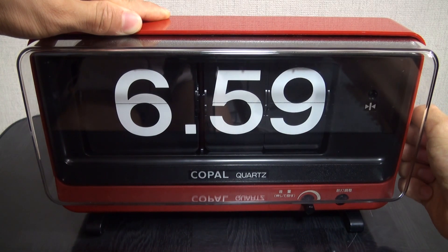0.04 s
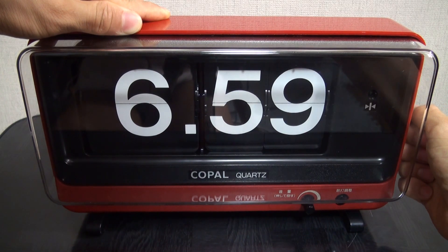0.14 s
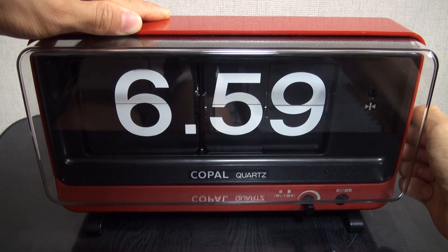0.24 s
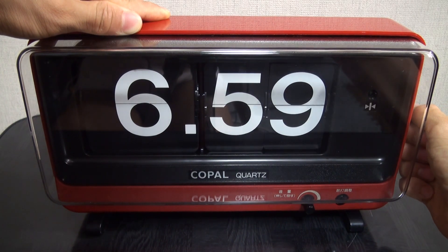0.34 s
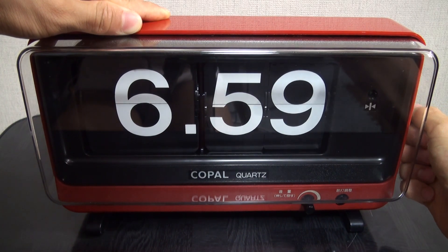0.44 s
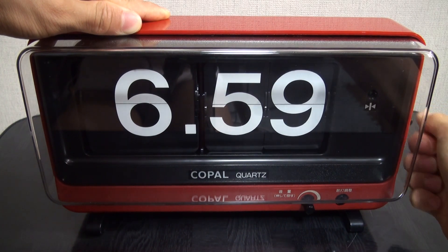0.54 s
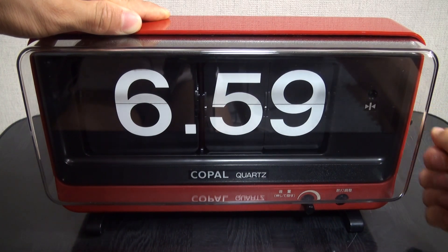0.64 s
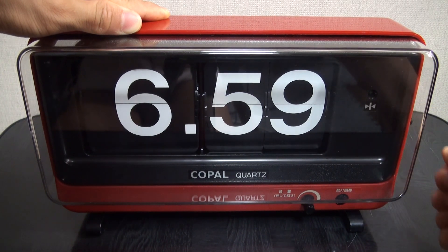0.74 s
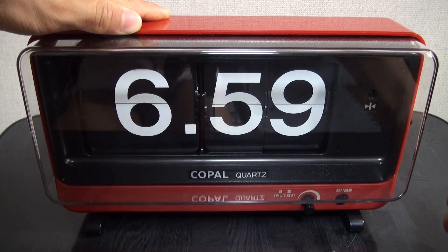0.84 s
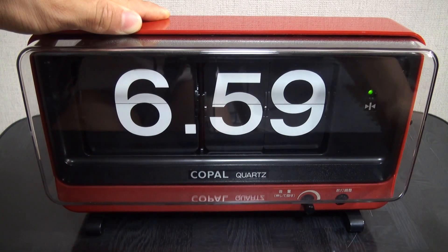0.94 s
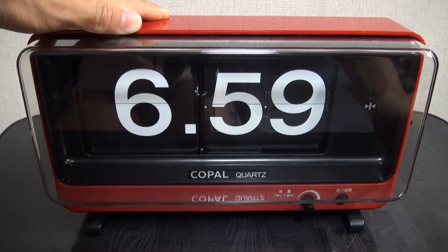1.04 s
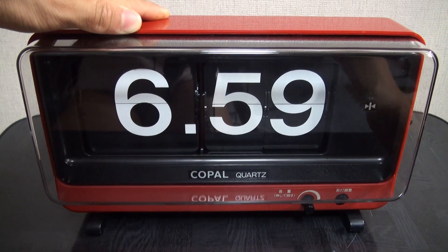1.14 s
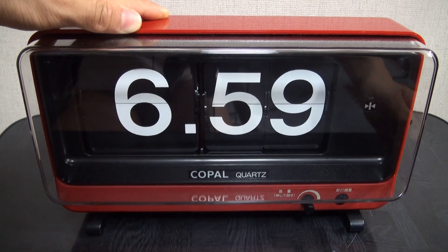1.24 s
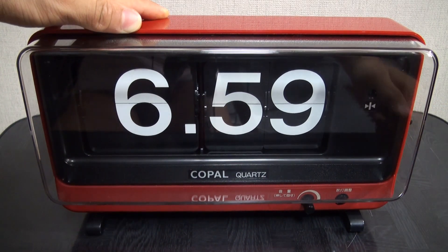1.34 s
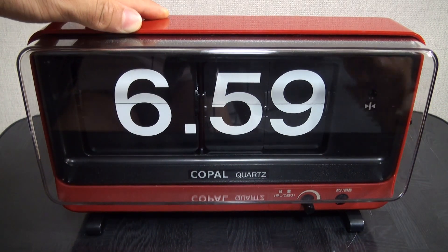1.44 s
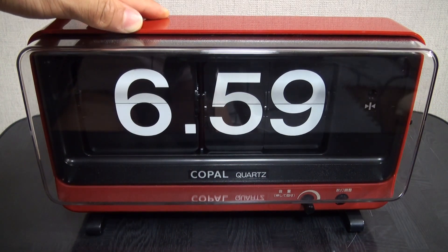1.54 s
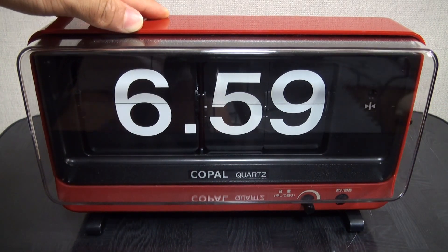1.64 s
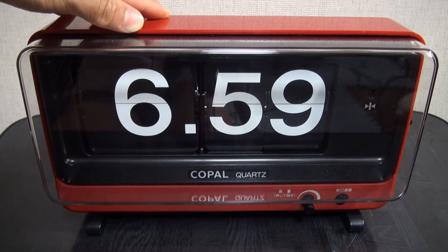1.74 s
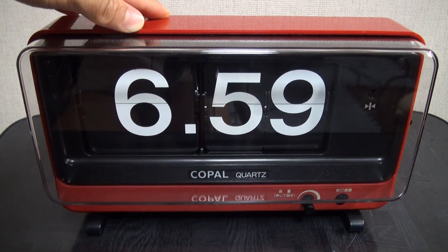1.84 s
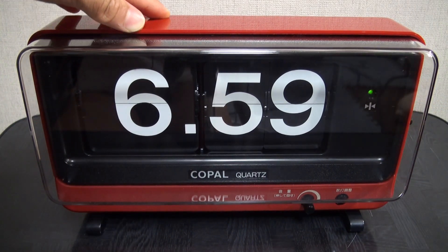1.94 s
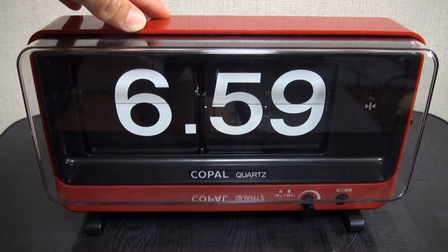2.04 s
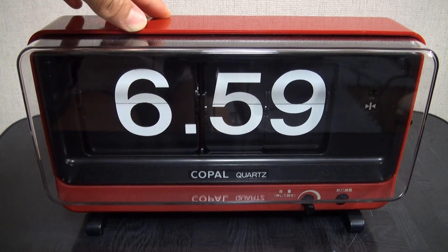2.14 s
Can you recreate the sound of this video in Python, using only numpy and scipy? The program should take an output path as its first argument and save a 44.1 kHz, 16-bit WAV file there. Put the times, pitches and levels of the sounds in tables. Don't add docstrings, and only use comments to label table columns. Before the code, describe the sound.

Close up in a small humming room, a plastic clock knob clicks sharply into place, a dull drag and thump follow, then the other hand makes a lighter click, a faint knock and tiny creaks.

```python
import sys
import numpy as np
from scipy import signal
from scipy.fft import rfft, irfft
from scipy.io import wavfile

SR = 44100
rng = np.random.default_rng(int(sys.argv[2]) if len(sys.argv) > 2 else 0)


def wrap_up_sound(samples):
    columns = np.atleast_2d(samples).T
    tamed = np.clip(columns, -1, 1)
    steps = np.round(tamed * 32767).astype(np.int16)
    wavfile.write(sys.argv[1], SR, steps)


def how_loud(loudness_db):
    steps = np.asarray(loudness_db, float) / 20
    return 10 ** steps


N = 97020


def rms_one(x):
    return x / np.sqrt(np.mean(x ** 2) + 1e-20)


def at_hz(points, hz):
    table_hz, values = np.array(points).T
    return np.interp(np.log(hz), np.log(table_hz), values)


def placed(sound, s):
    out, i = np.zeros(N + SR), int(s * SR)
    out[i:i + len(sound)] = sound
    return out[:N]


def resonate(x, hz, width_hz):
    r = np.exp(-np.pi * width_hz / SR)
    gain = (1 - r * r) / 2
    return signal.lfilter([gain, 0, -gain], [1, -2 * r * np.cos(2 * np.pi * hz / SR), r * r], x)


def hiss():
    # frequency in Hz, level in dB per Hz
    hiss_colour = [(240, -33.5), (400, -1), (1130, -6), (1280, -6.5), (1910, -9), (2150, -10),
                   (15500, -22.5)]
    # frequency in Hz, side minus mid in dB
    hiss_width = [(60, -45.5), (180, 11), (550, -6), (1650, 1), (4970, -0.5), (15000, -6.5)]
    level_db, rumble_db = -58.5, 1.5
    hz = np.maximum(np.arange(N // 2 + 1) * SR / N, 10)
    colour = how_loud(at_hz(hiss_colour, hz) + rumble_db * (hz < 300)) * (hz > 20)
    mid, side = rfft(rng.standard_normal((2, N))) * colour
    upper = (hz > 400) & (hz < 15500)
    scale = how_loud(level_db) / np.std(irfft(mid * upper, N))
    mid = irfft(mid, N)
    side = irfft(side * how_loud(at_hz(hiss_width, hz)), N)
    return scale * np.array([mid + side, mid - side])


def hum():
    # frequency in Hz, width in Hz, rms level in dB
    air_modes = [(28.4, 10, -68.5), (58, 24, -71.5), (76.5, 8, -68), (122.34, 13, -65.5), (160, 27, -71),
                 (220.5, 40, -60.5), (272, 35, -60.5), (363, 14, -69.5), (554.3, 40, -73)]
    sway_db, side_db = -1, -28
    out = 0
    for hz, width, db in air_modes:
        mode = rng.standard_normal((2, N + SR))
        for _ in range(2):
            mode = resonate(mode, hz, width * 1.65)
        mode = mode[:, SR:]
        sway = np.interp(np.arange(N), np.linspace(0, N, num=16), rng.standard_normal(16))
        out = out + how_loud(db + sway_db * sway) * rms_one(mode)
    mid, side = out
    return mid + how_loud(side_db) * side * [[1], [-1]]


def room(x):
    # frequency in Hz, 60 dB decay time in seconds
    decay = [(250, 0.37), (600, 0.17), (1500, 0.19), (4000, 0.21), (10000, 0.22)]
    # frequency in Hz, left-right likeness from 0 to 1
    likeness = [(200, 1), (600, 0.99), (2000, .71), (6000, 0.86), (13000, 0.14)]
    # frequency in Hz, level in dB
    wall_colour = [(250, 2.5), (550, 2.5), (1200, 2.2), (5000, -1.3), (13000, -1.1)]
    level_db, gap_s = -4, 0.0015
    t = np.arange(SR // 2) / SR
    edges, answer = 100 * 2 ** np.arange(0, 7.6, .5), 0
    for low, high in zip(edges, edges[1:]):
        band_pass = signal.butter(2, [low, high], "band", fs=SR, output="sos")
        mid, side = signal.sosfilt(band_pass, rng.standard_normal((2, len(t))))
        hz = np.sqrt(low * high)
        alike = np.clip(at_hz(likeness, hz), 0, 1)
        band = np.sqrt(1 + alike) * mid + np.sqrt(1 - alike) * side * [[1], [-1]]
        answer = answer + band * how_loud(at_hz(wall_colour, hz) - 60 * t / at_hz(decay, hz))
    answer = answer * np.clip(t / gap_s, 0, 1) ** 2
    answer = answer / np.sqrt(np.sum(answer ** 2) / 2)
    return how_loud(level_db) * signal.fftconvolve(x[None], answer)[:, :N]


def rattle(swell_s, hold_s, t60):
    impacts_per_s, spread_db = 4400, 4
    t = np.arange(SR // 4) / SR
    hits = (rng.random(len(t)) < impacts_per_s / SR) * rng.choice([-1, 1], len(t))
    sizes = how_loud(spread_db * np.minimum(rng.exponential(1, len(t)), 3))
    swell = np.minimum(t / swell_s, 1) ** 2
    fade = how_loud(-60 * np.maximum(t - swell_s - hold_s, 0) / t60)
    return rms_one(hits * sizes) * swell * fade + 1e-18


def strike(hits, body):
    rings = 0
    for k, ((hz, width, db), hit) in enumerate(zip(body, hits)):
        rings = rings + (-1) ** k * how_loud(db) * np.sqrt(width) * rms_one(resonate(hit, hz, width))
    return np.sqrt(.012 / .25) * rms_one(rings)


def creaks():
    # start in seconds, level in dB, pitch in Hz, width in Hz, length in seconds
    creak_rows = [(0.138, -52, 530, 100, 0.0092), (.418, -49.5, 934, 250, 0.0056),
                  (.419, -72, 2000, 1500, .006), (0.4655, -38.5, 570, 500, 0.003),
                  (0.984, -60, 6960, 9200, .002), (.990, -50.5, 1300, 2980, 0.0042),
                  (0.9904, -52, 9000, 8000, .002), (1.264, -59.5, 1500, 600, .003),
                  (1.356, -60, 1120, 150, 0.0057), (1.644, -59.5, 1150, 120, .008),
                  (1.982, -64.5, 2470, 3000, 0.017)]
    out = 0
    for s, db, hz, width, length in creak_rows:
        creak = resonate(rattle(0.00033, length, 0.029), hz, width)
        even_level = np.sqrt(SR / np.pi / width)
        out = out + placed(how_loud(db) * even_level * creak, s)
    return out


def thud():
    # start in seconds, level in dB
    bumps = [
        (0.4736, -30.5),
    ]
    # frequency in Hz, width in Hz, level in dB
    hollow_case = [(228, 50, -15), (282, 55, -13), (372, 50, -14), (484, 45, -7), (556, 65, 0)]
    push = signal.unit_impulse(SR // 4) + 1e-18
    boom = strike([resonate(push, hz, width) for hz, width, _ in hollow_case], hollow_case)
    return sum(placed(how_loud(db) * boom, s) for s, db in bumps)


def contact(row, body):
    soft_below_hz, brief_s = 600, .01
    s, db, swell_s, hold_s, t60 = row
    hits = rattle(swell_s, hold_s, t60)
    push = signal.unit_impulse(len(hits), int(swell_s * SR)) + 1e-18
    near = strike([push if hz < soft_below_hz else hits for hz, _, _ in body], body)
    far = strike([push] * len(body), body) if swell_s < brief_s else near
    return how_loud(db) * np.array([placed(near, s), placed(far, s)])


def hand_and_knob():
    # start in seconds, level in dB, swell in seconds, hold in seconds, 60 dB fade in seconds
    contact_rows = [
        (0.2179, -21.5, 0.0015, 0.002, 0.023),
        (.2183, -26, 0.0038, 0.001, 0.013),
        (0.4631, -32.5, 0.016, 0.0061, 0.013),
        (1.0436, -34.5, 0.00041, 0.0039, 0.0077),
        (1.2731, -45, .0035, 0.0012, 0.017),
    ]
    # frequency in Hz, width in Hz, level in dB
    snap_body = [(4010, 360, -6), (5560, 350, -2), (6460, 510, -4.5), (6900, 850, -8), (8700, 1460, -9),
                 (10030, 730, -7.5), (12260, 540, 2), (12500, 1600, -4.5), (14800, 600, -5)]
    seat_body = [(181.4, 68, -9.5), (280, 120, -8.5), (508, 65, -1), (850, 410, -9.5), (1150, 164, -2),
                 (1300, 80, 0.5), (1732, 120, 1), (2400, 270, 2), (3760, 360, -12)]
    drag_body = [(926, 46, 4.5), (1150, 260, 1.5), (1880, 300, 1.5), (2420, 290, 0), (2820, 260, -4),
                 (3170, 650, -10), (3820, 700, -10.5), (4500, 430, -12.5), (6500, 2300, -24),
                 (10500, 4600, -35)]
    click_body = [(220, 123, -6.5), (319, 70, 1), (502, 106, -4.5), (630, 140, -9), (933, 85, -8),
                  (1234, 170, -6.5), (2000, 220, -4.5), (2500, 670, -6.5), (3290, 700, -8.5),
                  (4530, 300, -9.5), (5720, 370, -6), (7250, 1450, -14.5), (9400, 3000, -17),
                  (11230, 1500, -17.5), (12900, 1200, -30)]
    knock_body = [(221, 87, -1.5), (295, 102, 1.5), (383, 89, -2), (500, 77, -6.5), (890, 220, -15),
                  (1230, 200, -12), (2100, 730, -18), (3300, 200, -18.5)]
    bodies = (snap_body, seat_body, drag_body, click_body, knock_body)
    snap, *others = map(contact, contact_rows, bodies)
    return snap, others


def knob_lean(snap):
    treble = signal.butter(2, 9850, "high", fs=SR, output="sos")
    return how_loud(-6.1) * signal.sosfilt(treble, snap) * [[-1], [1]]


def scene():
    snap, others = hand_and_knob()
    near, far = snap + sum(others) + thud() + creaks()
    return near + knob_lean(snap[0]) + room(far) + hiss() + hum()


def band_limit(x):
    return signal.sosfilt(signal.butter(12, 16330, fs=SR, output="sos"), x)


def record(dry):
    top_cut = signal.ellip(10, .5, 60, 15680, fs=SR, output="sos")
    return band_limit(signal.sosfilt(top_cut, dry))


dry = scene()
out = record(dry)
wrap_up_sound(out)
```